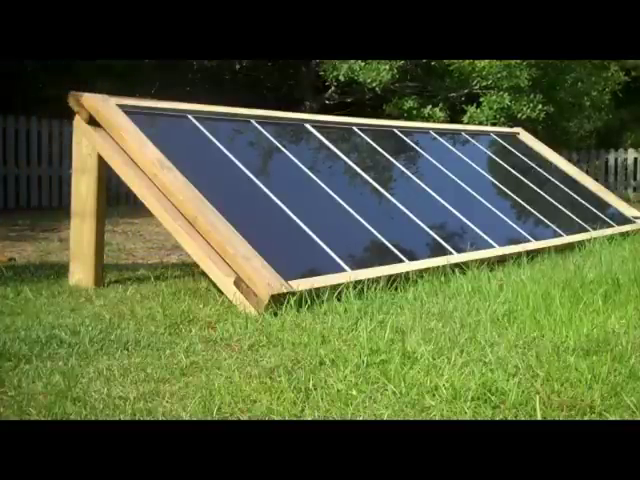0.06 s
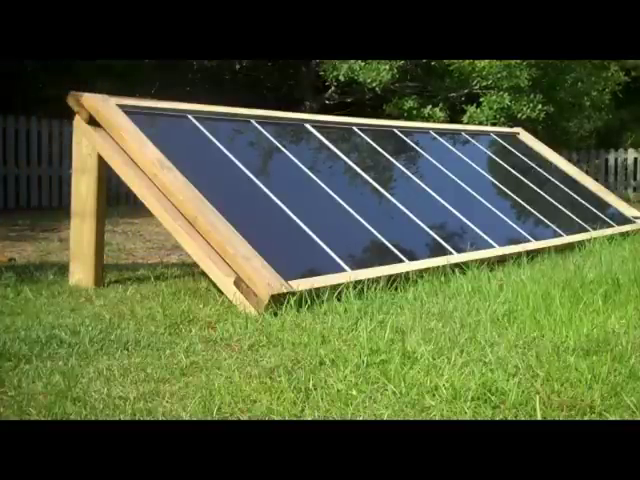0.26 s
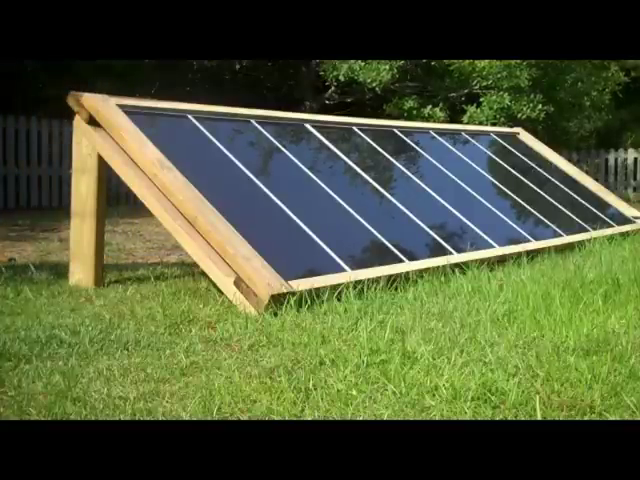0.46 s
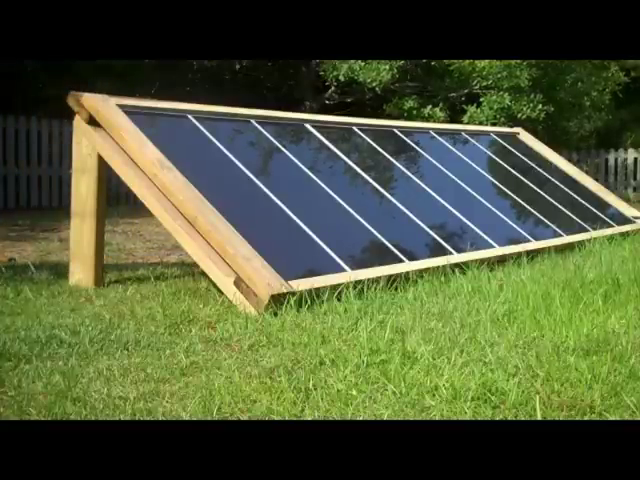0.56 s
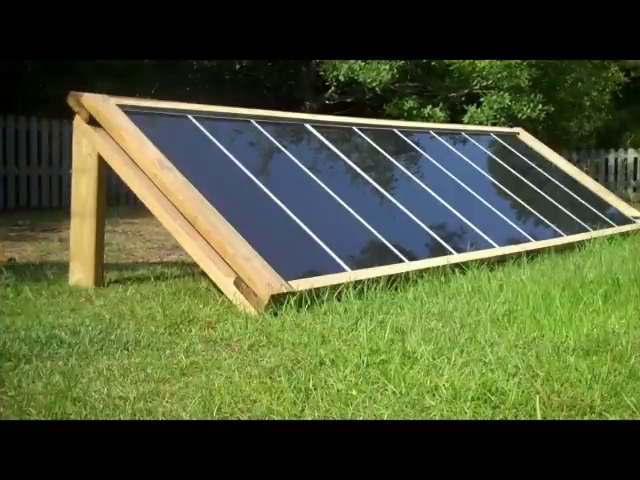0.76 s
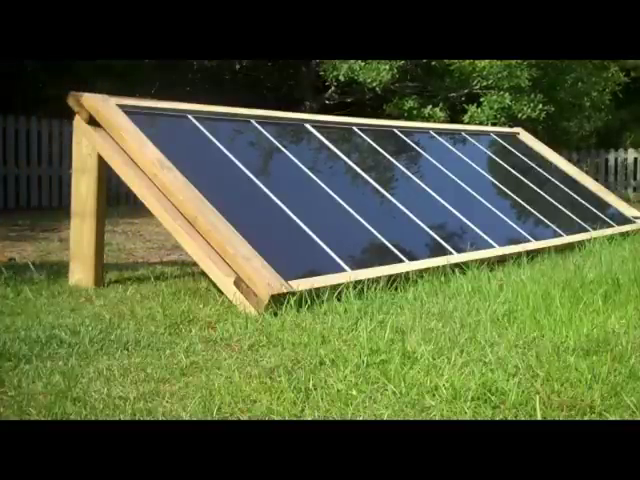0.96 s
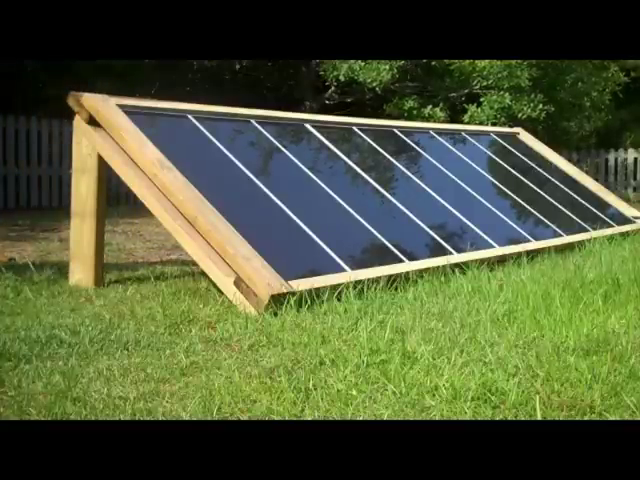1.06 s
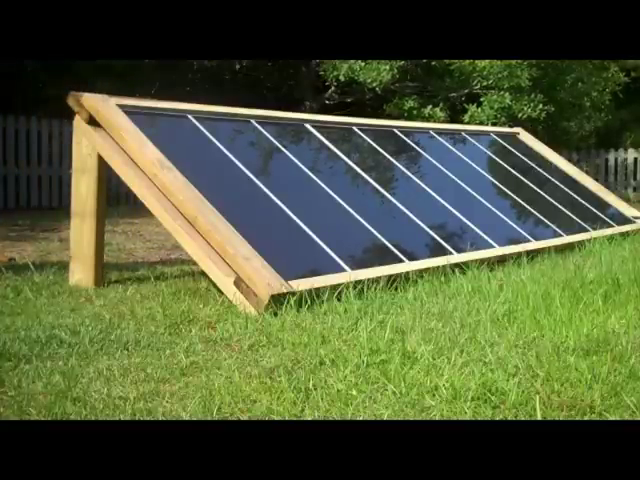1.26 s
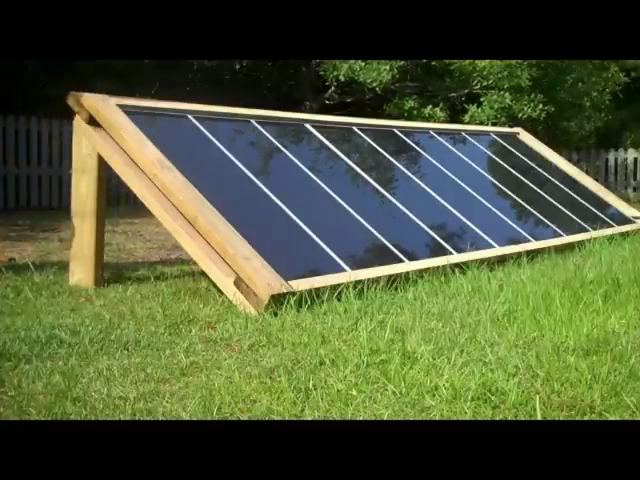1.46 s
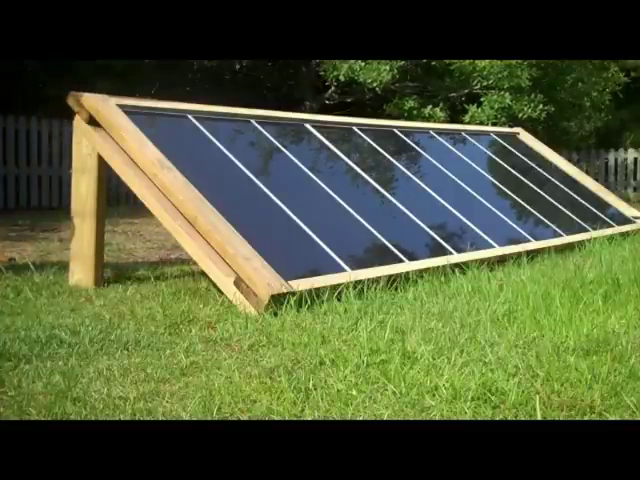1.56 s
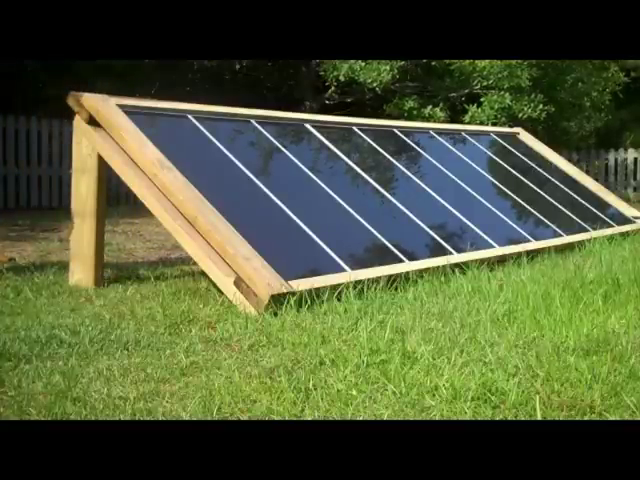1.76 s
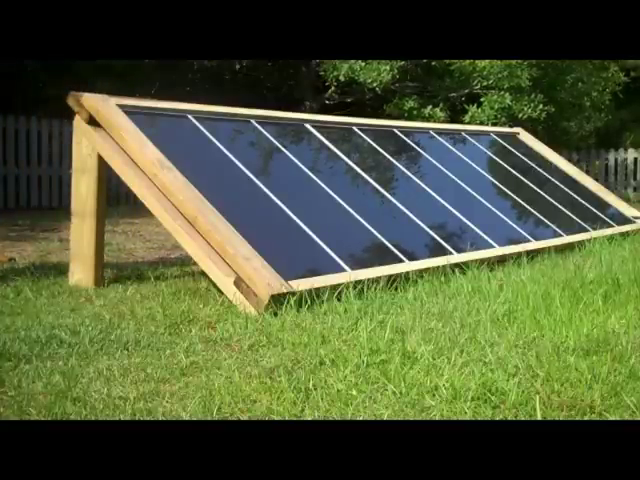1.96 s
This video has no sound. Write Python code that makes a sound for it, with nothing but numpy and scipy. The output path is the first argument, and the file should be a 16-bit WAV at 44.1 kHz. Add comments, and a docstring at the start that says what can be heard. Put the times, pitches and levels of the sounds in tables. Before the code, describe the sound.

Sharp, dry wooden knocks of a framed panel shifted on a lawn: light ticks from 0.14 s, a knock at 0.24 and the loudest, slightly clipped, at 0.29; ticks fade by 0.43. A second pair hits at 0.80 and 0.84 amid clicks from 0.73 to 0.97. Faint taps follow at 1.52 and 1.70, a tiny tick at 1.98. Close, bright stereo; short yard echo, faint murmur and steady insect hiss throughout.

```python
"""A lawn in a yard with fence and trees: two pairs of sharp, dry knocks as a wood-framed panel is shifted.
Light ticks and two faint taps are its parts settling; contacts are noise bursts, wood is decaying sines.
The yard answers faintly, as decaying noise. Far behind, a murmur and a high hiss, probably insects, are
coloured noise. Two microphone ports ring at different treble pitches; the hardest knocks overload them."""
import sys
import numpy as np
from scipy import signal
from scipy.fft import rfft, irfft, next_fast_len
from scipy.io import wavfile
from scipy.ndimage import map_coordinates

SR = 44100
rng = np.random.default_rng(int(sys.argv[2]) if len(sys.argv) > 2 else 0)


def store_pcm(level_fs):
    """Save levels as 16-bit WAV."""
    pcm = np.round(np.clip(level_fs, -1, 1) * 32767).astype(np.int16)
    wavfile.write(sys.argv[1], SR, np.atleast_2d(pcm).T)


N = 88200  # samples: two seconds


def amp(db):
    """Decibels to gain."""
    return 10 ** (np.asarray(db) / 20)


def unit(x):
    """Scale to rms 1."""
    return x / np.sqrt(np.mean(x ** 2) + 1e-20)


def along(points, hz):
    """(f/Hz, value) points read on a log frequency axis."""
    f, v = np.transpose(points)
    return np.interp(np.log(hz + 1), np.log(f + 1), v)


def filtered(x, response):
    """x times a complex response of frequency."""
    n = x.shape[-1]
    padded = next_fast_len(n + SR // 8)
    spectrum = rfft(x, padded) * response(np.fft.rfftfreq(padded, 1 / SR))
    return irfft(spectrum, padded)[..., :n]


def noise(spectrum, shape):
    """Coloured noise of rms 1."""
    return unit(filtered(rng.standard_normal(shape), lambda hz: amp(along(spectrum, hz))))


def wobble(rate, n):
    """A smooth random curve, rate knots a second."""
    return map_coordinates(rng.standard_normal(n), [np.arange(n) * rate / SR], mode="wrap")


def causal(points, size=2048):
    """Minimum-phase impulse response with the given (f/Hz, level/dB) colour."""
    cepstrum = irfft(np.log(amp(along(points, np.fft.rfftfreq(size, 1 / SR)))))
    cepstrum[1:size // 2] *= 2
    cepstrum[size // 2 + 1:] = 0
    return irfft(np.exp(rfft(cepstrum)))


def fade(t, t60):
    """Exponential decay, 60 dB down after t60 seconds."""
    return np.exp(-np.log(1000) * t / np.maximum(t60, 1 / SR))


def panned(x, pan_db):
    """Tilt a sound between the sides; positive dB favours the left."""
    return x * amp(np.array([[pan_db], [-pan_db]]) / 2)


def add(track, s, sound):
    """Mix a sound in at time s."""
    part = track[:, round(s * SR):][:, :sound.shape[-1]]
    part += sound[..., :part.shape[1]]


# Far murmur, relative density: f/Hz, level per Hz/dB
MURMUR_SPECTRUM = [(20, -34), (40, -10), (70, -8.5), (130, 0), (200, -4), (300, -5.5), (450, -8.5),
                   (650, -3.5), (850, -2), (1100, -5), (1500, -10), (2200, -15), (5000, -34), (15000, -60)]
# Likeness of its two sides: f/Hz, left-right correlation
MURMUR_LIKENESS = [(30, 0.97), (150, 0.98), (900, 0.88), (2000, 0.29)]
MURMUR_DB, SWAY_DB = -51, 0.07  # level ahead of the ports, and its slow random sway


def murmur():
    """Far outdoor rumble: a shared and an opposed noise, mixed so the low end is nearly alike on both sides."""
    def mid_side_gains(hz):
        angle = np.arccos(np.clip(along(MURMUR_LIKENESS, hz), -1, 1)) / 2
        return np.array([np.cos(angle), np.sin(angle)])

    mid, side = filtered(noise(MURMUR_SPECTRUM, (2, N)), mid_side_gains)
    level = amp(MURMUR_DB + SWAY_DB * wobble(4.55, N))
    return level * np.array([mid + side, mid - side])


# High hiss, relative density: f/Hz, level per Hz/dB
HISS_SPECTRUM = [(200, -19), (1200, -9.5), (2500, -4), (4000, -2), (5500, 0.5), (6500, -4), (7500, 0),
                 (8400, -6), (9500, -11.5), (11500, -12.5), (14000, -34), (14400, -65)]
HISS_DB, HISS_PAN_DB = -52.5, -3.5  # level before the tilt to the right
INSECT_HZ, INSECT_WIDTH_HZ, INSECT_DB = 6770, 330, -61.5


def hiss():
    """Steady high hiss, independent on each side, with a narrow resonant band of distant insects."""
    white = rng.standard_normal((2, N))
    insects = unit(filtered(white, lambda hz: 1 / (1 + ((hz - INSECT_HZ) / INSECT_WIDTH_HZ) ** 2)))
    return panned(amp(HISS_DB) * noise(HISS_SPECTRUM, (2, N)) + amp(INSECT_DB) * insects, HISS_PAN_DB)


CRACK_RISE_S, SNAP_RISE_S = 0.00097, 0.000095
GRAIN_DB, GRAIN_HZ = 3, 1790  # level flutter of a rough contact: spread, random knots a second


def burst(t, spectrum, hold_s, t60, rise_s):
    """Grainy contact noise: it rises, holds while the parts grind, then dies."""
    shape = (1 - np.exp(-t / rise_s)) * fade(np.maximum(t - hold_s, 0), t60)
    flutter = amp(GRAIN_DB * wobble(GRAIN_HZ, len(t)))
    grains = noise(spectrum, len(t)) * flutter * shape
    return grains * np.linalg.norm(shape) / np.linalg.norm(grains)  # energy set by the envelope alone


# Woody crack, relative density: f/Hz, level per Hz/dB
CRACK_SPECTRUM = [(100, -41), (350, -15), (600, -5), (1200, 3), (2000, -1.5), (3200, 2), (4500, 0),
                  (5500, 2), (7500, -3), (14000, -18)]
CRACK_T60_S = 0.029  # for knocks and taps; ticks set their own


def cracking(t, hold_s, t60):
    """The woody part of a contact: a slower-rising noise burst."""
    return burst(t, CRACK_SPECTRUM, hold_s, t60, CRACK_RISE_S)


# Bright snap, relative density: f/Hz, level per Hz/dB
SNAP_SPECTRUM = [(1000, -55), (3500, -17), (5200, -2.5), (6300, 0.5), (7700, 5.5), (8700, -1.5),
                 (10000, -2), (12000, -4.5), (14000, -2), (14500, -32), (16000, -36)]
BOUNCE_S, BOUNCE_DB = .0017, -8  # reflection: delay, level against the snap


def snapping(t, hold_s, t60, pan_db):
    """The bright part of a contact: a fast-rising noise burst and its quick reflection."""
    bright = burst(t, SNAP_SPECTRUM, hold_s, t60, SNAP_RISE_S)
    bounce = np.pad(bright, (round(BOUNCE_S * SR), 0))[:len(t)]
    return panned(bright + amp(BOUNCE_DB) * bounce, pan_db)


# The frame's three main modes: f/Hz, t60/s
FRAME_MODES = [(985, 0.027), (1215, 0.023), (1550, 0.025)]
# The frame's other modes: f/Hz, relative level/dB, t60/s
FRAME_SIDE_MODES = [(708, -13.5, 0.046), (1687, 4, 0.012), (2150, -9, 0.025), (2264, -11, 0.052),
                    (2780, -32, 0.031), (3100, -5, 0.014), (5680, -22, 0.036)]
RING_RISE_S, MODE_SCATTER_DB = 0.0008, 3.5  # build-up; random spread of each mode's level
TONE_OCTAVES = 0.58  # spread of the modes that a light touch reaches


def ring(t, main_dbs, side_mode_db, tone_hz=None):
    """The frame's decaying modes; the place of the blow sets how strongly each one sounds."""
    modes = [(hz, db, t60) for (hz, t60), db in zip(FRAME_MODES, main_dbs)]
    modes += [(hz, db + side_mode_db, t60) for hz, db, t60 in FRAME_SIDE_MODES]
    tones = np.zeros(len(t))
    for hz, db, t60 in modes:
        level = amp(db + MODE_SCATTER_DB * rng.standard_normal())
        if tone_hz is not None:
            level *= np.exp(-.5 * (np.log2(hz / tone_hz) / TONE_OCTAVES) ** 2)
        tones += level * fade(t, t60) * np.sin(2 * np.pi * hz * t)
    return tones * (1 - np.exp(-t / RING_RISE_S))


# Light ticks: t/s, wood ring level before halving/dB, centre of the modes reached f/Hz, crack level/dB,
# snap level/dB, t60 of crack and snap/s, snap tilt to the left/dB
TICK_EVENTS = [(.142, -25.5, 800, -43, -66, 0.028, 2), (.188, -22, 780, -54, -48.5, 0.047, 6),
               (0.2227, -27, 1500, -29.5, -26.5, 0.034, 4.5), (0.2314, -32, 1600, -31.5, -46, 0.053, 5),
               (.237, -35, 1600, -41, -39, 0.062, 4), (.262, -25, 1460, -42, -44, 0.02, 11),
               (0.268, -38, 1400, -34, -36, 0.046, 0), (0.2797, -32, 2200, -23, -23, 0.022, -1),
               (0.2878, -21.5, 1220, -36, -39, 0.064, 3), (0.3203, -36, 1150, -42, -36, 0.06, 6),
               (0.3589, -53, 2800, -35.5, -31, 0.036, 1.5), (0.3994, -62, 1200, -53, -30.5, 0.014, -11.5),
               (.428, -58, 1200, -46.5, -47, 0.08, 2.5), (.7265, -24.5, 845, -44, -64, .024, 3),
               (.749, -44, 1020, -42, -45, 0.051, -3), (.775, -52, 2600, -39, -49, 0.057, -5),
               (.7875, -37, 1190, -38, -32, 0.011, 4), (.793, -28, 1490, -24, -34, 0.017, 0),
               (0.8161, -29, 1400, -30.5, -28, 0.038, 0), (0.8207, -34, 1400, -34, -28, 0.014, 1),
               (0.828, -20.5, 1370, -38, -44, 0.023, 3), (0.836, -40, 1200, -30, -32, 0.026, 3),
               (0.8412, -43, 1200, -31, -29, 0.025, -2), (.869, -54, 1200, -41, -30, 0.012, 6),
               (0.8806, -34, 1140, -34, -34, 0.039, 5.5), (.899, -43, 1300, -45, -39, 0.018, 6),
               (.909, -52, 1260, -33, -24, 0.0099, 3), (.948, -53, 1200, -42, -38, 0.019, -5),
               (0.971, -65, 1200, -45, -37.5, 0.012, -1), (1.981, -36, 1600, -58, -62, .02, 10)]
TICK_SIDE_MODE_DB = -6


def ticks():
    """Light touches of the frame's parts, most around the knocks and one late: a ring, a crack and a snap."""
    out, t = np.zeros((2, N)), np.arange(SR // 10) / SR
    for s, wood, tone_hz, crack, snap, t60, pan_db in TICK_EVENTS:
        body = amp(wood) * ring(t, (0, 0, 0), TICK_SIDE_MODE_DB, tone_hz) / 2
        body = body + amp(crack) * cracking(t, 0, t60)
        add(out, s, body + amp(snap) * snapping(t, 0, t60, pan_db))
    return out


# Length of the yard's tail: f/Hz, t60/s (none where it is not positive)
YARD_DECAY = [(300, -0.1), (1500, 0.16), (4000, 0.45), (8000, 0.5)]
# Colour of the whole answer: f/Hz, level/dB
YARD_TINT = [(100, -18), (1200, 3), (3500, 7), (8000, -6.5), (14000, 2)]
YARD_DB, NEAR_DB, NEAR_T60_S = -20, -20, 0.07  # tail and near scatter, levels before colouring


def yard(x):
    """Quick scatter from near surfaces and a longer, faint tail from fence and trees, both decaying noise."""
    hz, t, cells = signal.stft(rng.standard_normal((2, SR // 2)), SR, nperseg=256)
    decay = fade(t, along(YARD_DECAY, hz)[:, None])
    tail = signal.istft(cells * decay, SR, nperseg=256)[1]
    near = rng.standard_normal(tail.shape) * fade(np.arange(tail.shape[1]) / SR, NEAR_T60_S)
    answer = amp(YARD_DB) * tail / np.linalg.norm(tail[0])
    answer = answer + amp(NEAR_DB) * near / np.linalg.norm(near[0])
    echoed = signal.fftconvolve(x, answer, axes=1)[:, :N]
    return filtered(echoed, lambda f: amp(along(YARD_TINT, f)))


# Colour of the short pressure pulse: f/Hz, relative level/dB
PULSE_COLOUR = [(25, -5), (80, -6), (220, 4.5), (450, -11.5), (1000, 6), (4000, -60)]
# Hard knocks: t/s, contact length/s, low, middle and upper mode level/dB, side mode level/dB,
# crack level/dB, snap level/dB, pressure pulse level/dB, snap tilt to the left/dB
KNOCK_EVENTS = [(0.2441, 0.0013, -29, -19, -19, -16, -20.5, -26.5, -57, 1),
                (.2947, 0.0034, -34, -4, -15.5, -13.5, -14.5, -9.5, -28, 2.5),
                (0.7957, 0.00056, -32, -35, -17, -29.5, -24, -15, -57, 3),
                (0.8446, 0.00178, -20, -19, -14, -25, -21, -11.5, -28, 1)]
SNAP_T60_S = 0.015
RING_LAG_SHARE = 0.463  # ring and pulse start partway through the contact
PULSE_ENERGY_T60_S, PULSE_RIGHT_SHARE = 0.016, -.2  # decay with the pulse's energy; inverted on the right


def knocks():
    """Each hard knock is a bright snap, a woody crack, a small pressure pulse and the frame's short ring."""
    out, t = np.zeros((2, N)), np.arange(SR // 10) / SR
    pulse = causal(PULSE_COLOUR, size=len(t))
    pulse = pulse / np.linalg.norm(pulse) * np.linalg.norm(fade(t, PULSE_ENERGY_T60_S))
    stereo_pulse = np.outer((1, PULSE_RIGHT_SHARE), pulse)
    for s, hold, low, middle, upper, side, crack, snap, pulse_db, pan_db in KNOCK_EVENTS:
        contact = amp(crack) * cracking(t, hold, CRACK_T60_S)
        add(out, s, contact + amp(snap) * snapping(t, hold, SNAP_T60_S, pan_db))
        body = ring(t, (low, middle, upper), side) + amp(pulse_db) * stereo_pulse
        add(out, s + RING_LAG_SHARE * hold, body)
    return out


# Faint taps of smaller parts: t/s, level/dB
TAP_EVENTS = [(1.5175, -37), (1.698, -40)]
# Modes of each small part, one list a tap: f/Hz, relative level/dB, t60/s
TAP_RINGS = [
    [(1260, -1, 0.023), (3280, -1, 0.026), (8000, -2.5, .015)],
    [(1160, -6, 0.061), (1630, -8, .025), (2420, -1, 0.014), (5040, 4.5, 0.018)],
]
TAP_CRACK_DB = -2  # against the tap's level


def taps():
    """Two smaller parts settle later, each with its own short ring and a crack."""
    out, t = np.zeros((2, N)), np.arange(SR // 10) / SR
    for (s, level), modes in zip(TAP_EVENTS, TAP_RINGS):
        tones = sum(amp(db) * fade(t, t60) * np.sin(2 * np.pi * hz * t) for hz, db, t60 in modes)
        add(out, s, amp(level) * (tones + amp(TAP_CRACK_DB) * cracking(t, 0, CRACK_T60_S)))
    return out


RIGHT_LAG_S = .00003


def scene():
    """The panel's direct sound reaches the left port first; yard and background surround it."""
    wood = knocks() + ticks() + taps()
    lags = np.array([[0], [RIGHT_LAG_S]])
    direct = filtered(wood, lambda hz: np.exp(-2j * np.pi * hz * lags))
    return direct + yard(wood) + murmur() + hiss()


# Microphone ports, left and right: f/Hz, level/dB
LEFT_PORT_COLOUR = [(1000, -0.5), (3000, 3), (5000, 1), (6300, 2), (7200, 4.5), (8200, 12), (9200, 8.5),
                    (10500, -0.5), (14000, -5.5)]
RIGHT_PORT_COLOUR = [(1000, 0), (3000, 2), (4800, 2), (5600, 4), (6250, 12.5), (7000, 0.5), (8000, -2),
                     (9300, -5.5), (10800, -14.5), (14000, -26)]
# Microphone self-noise, relative density: f/Hz, level per Hz/dB
SELF_NOISE_SPECTRUM = [(100, -8.5), (10000, 0), (13900, -4), (14400, -55)]
SELF_NOISE_DB = -64.5
CLIP_LEVEL = 0.72  # overload point, as a share of full scale
TOP_HZ, TOP_ORDER = 15900, 60  # band limit: corner, steepness


def record(dry):
    """Port resonances, self-noise, overload by hard clipping, and the band limit."""
    ports = np.array([causal(LEFT_PORT_COLOUR), causal(RIGHT_PORT_COLOUR)])
    heard = signal.fftconvolve(dry, ports, axes=1)[:, :N]
    heard = heard + amp(SELF_NOISE_DB) * noise(SELF_NOISE_SPECTRUM, (2, N))
    overloaded = np.clip(heard, -CLIP_LEVEL, CLIP_LEVEL)
    return filtered(overloaded, lambda hz: 1 / np.sqrt(1 + (hz / TOP_HZ) ** (2 * TOP_ORDER)))


dry = scene()
out = record(dry)
store_pcm(out)
```